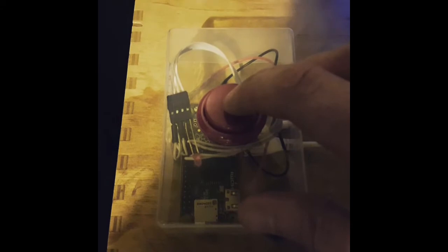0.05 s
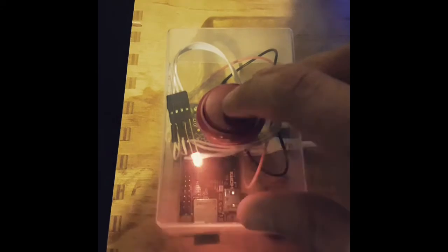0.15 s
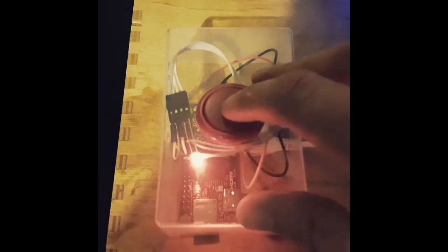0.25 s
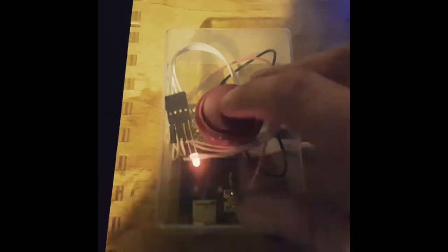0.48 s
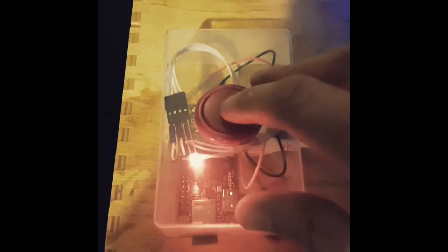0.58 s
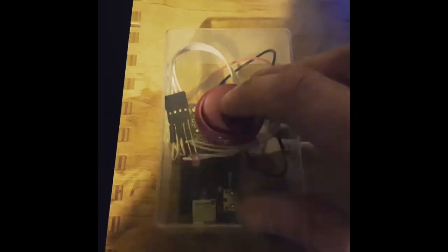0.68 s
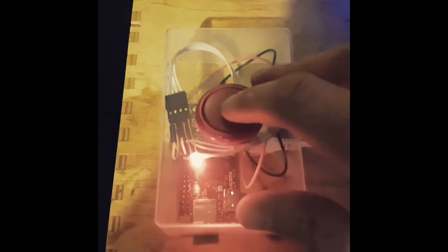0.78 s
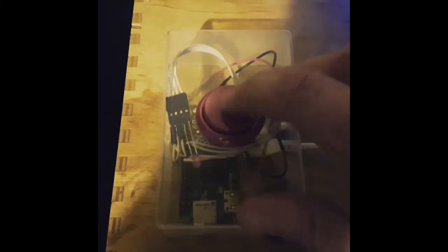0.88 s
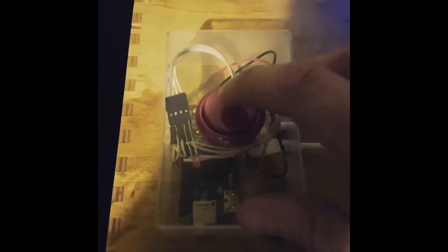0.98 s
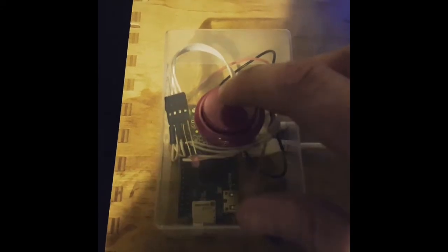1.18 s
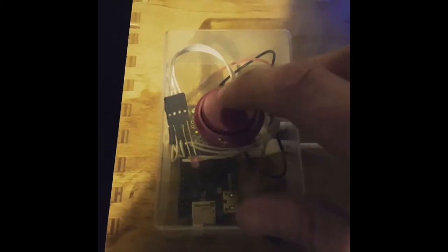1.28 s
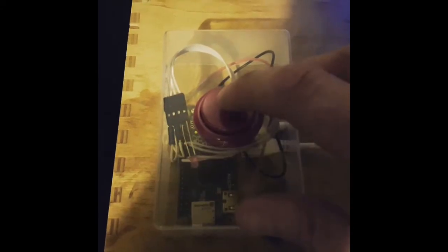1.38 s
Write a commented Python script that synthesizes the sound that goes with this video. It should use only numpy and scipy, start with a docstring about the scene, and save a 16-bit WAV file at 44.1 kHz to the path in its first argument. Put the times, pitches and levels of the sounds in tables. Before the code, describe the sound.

Close to the microphone in a quiet room, a large plastic push button clicks four times in a fast, even rhythm. Crisp snaps alternate with hollow clacks as it springs back, with light thumps of its box on the table.

```python
"""An arcade button in a plastic box is pressed and let go four times, close up in a quiet room.
On each press the plunger rubs down its guide, the microswitch snaps brightly and the plunger hits bottom
about 11 ms later; on release it springs up against its stop with a duller clack. Each hard contact rings
the button, the box and the switch spring. Short hollow tones give the clicks a low, falling ring and add
soft knocks between them. The box thumps on the table, over faint room air and hum."""
import sys
import numpy as np
from scipy import signal
from scipy.fft import rfft, irfft
from scipy.io import wavfile
from scipy.ndimage import uniform_filter1d

SR = 44100
rng = np.random.default_rng(int(sys.argv[2]) if len(sys.argv) > 2 else 0)


def wav_record(signal):
    """Record a signal, one row per channel, as 16-bit PCM in the file named by sys.argv[1]."""
    frames = np.transpose(np.atleast_2d(signal))
    bounded = np.clip(frames, -1, 1)
    # unit amplitude maps onto the largest positive 16-bit level
    quanta = np.round(bounded * 32767).astype(np.int16)
    wavfile.write(sys.argv[1], SR, quanta)


N = 63945
T = np.arange(N) / SR
LOG_FREQS = np.log(np.maximum(np.fft.rfftfreq(N, 1 / SR), 1))


def undb(db):
    """Decibels to gain."""
    return 10 ** (np.asarray(db) / 20)


def fade(t60_s, hold_s=0):
    """Full level for the hold, then exponential decay."""
    return np.exp(-np.log(1000) * np.maximum(T - hold_s, 0) / t60_s)


def rise(attack_s):
    """Smooth attack."""
    return 1 - np.exp(-T / attack_s)


def ring(hz, t60_s):
    """One decaying mode."""
    return np.sin(2 * np.pi * hz * T) * fade(t60_s)


def coloured(x, curve):
    """EQ a sound along a curve of (freq_hz, gain_db) points."""
    hz, db = np.array(curve).T
    return irfft(rfft(x) * undb(np.interp(LOG_FREQS, np.log(hz), db)), N)


def noise(curve):
    """Noise of rms 1, coloured by an EQ curve."""
    y = coloured(rng.standard_normal(N), curve)
    return y / y.std()


def low_cut(x, hz):
    """Roll off the bass."""
    return signal.sosfilt(signal.butter(2, hz, "high", fs=SR, output="sos"), x)


def add(out, start_s, sound):
    """Mix a sound in from a start time."""
    i = int(start_s * SR)
    out[i:] += sound[:N - i]


def lead_in(out, end_s, sound, t60_s):
    """Mix in a sound that swells up to an end time and stops dead."""
    i = int(end_s * SR)
    out[:i] += sound[:i] * fade(t60_s)[:i][::-1]


# colour of the room air: freq_hz, gain_db
AIR_EQ = [(15, -43), (25, -23.5), (76, -9.5), (127, -5), (175, -6.5), (263, -7), (301, -6.5), (427, -11.5),
          (575, -13.5), (936, -17.5), (1330, -19.5), (6380, -38.5), (12500, -40.5), (14000, -36),
          (16000, -43)]
# steady hum: pitch_hz, level_db
HUM_TONES = [(140, -78.5), (296, -73.5), (425, -80)]

def room_tone():
    """A bed of quiet air and faint hum."""
    hum = sum(undb(db) * np.sqrt(2) * np.sin(2 * np.pi * (hz * T + rng.random())) for hz, db in HUM_TONES)
    return undb(-64.5) * noise(AIR_EQ) + hum


# plunger strokes: end_s, rub_db, swell_t60_s, squeak_db
STROKES = [(0.248, -53.5, 0.12, -54), (0.389, -41.5, 0.061, -60), (0.461, -45.5, 0.12, -54),
           (0.557, -38.5, 0.043, -54), (0.64, -51, 0.36, -39.5), (0.736, -47.5, 0.073, -57),
           (0.822, -46, 0.21, -72), (0.932, -41, 0.11, -55)]
# colours of the rub and its thin squeak: freq_hz, gain_db
RUB_EQ = [(100, -7.5), (400, 5.5), (750, 6.5), (1150, 2.5), (1700, -17), (3300, -16), (6000, -43),
          (11000, -38), (14000, -29), (16000, -33)]
SQUEAK_EQ = [(1500, -21), (2600, -30), (2980, 10), (3400, -10), (6000, -27), (11000, -28), (14000, -5),
             (16000, -13)]

def plunger_slides():
    """Plastic rubs on plastic, swelling as the plunger speeds along its guide up to each click."""
    out = np.zeros(N)
    grain_s, roughness_db = 0.002, 2.5
    grain = uniform_filter1d(rng.standard_normal(N), int(grain_s * SR))
    rub = noise(RUB_EQ) * undb(roughness_db * grain / grain.std())
    squeak = noise(SQUEAK_EQ)
    for end_s, rub_db, swell_t60_s, squeak_db in STROKES:
        lead_in(out, end_s, undb(rub_db) * rub, swell_t60_s)
        lead_in(out, end_s, undb(squeak_db) * squeak, t60_s=0.034)
    return out


# short hollow tones, on and between the clicks: start_s, level_db, pitch_hz
HOLLOW_NOTES = [(.2005, -46.5, 660), (.208, -45.5, 730), (0.238, -52, 734), (.2485, -36.5, 710),
                (.2525, -34.5, 663), (.2625, -44.5, 840), (0.3448, -45.5, 656), (.3900, -30.5, 609),
                (0.3949, -46, 610), (0.417, -43, 815), (.4210, -36, 680), (.464, -35.5, 740),
                (.534, -42.5, 635), (0.542, -34.5, 810), (.5622, -30, 630), (0.623, -43, 1040),
                (0.6397, -32, 648), (0.6432, -29, 597), (.6520, -28.5, 574), (.7000, -46, 665),
                (.7300, -35.5, 836), (.7445, -33.5, 701), (0.781, -32, 640), (0.807, -53, 780),
                (.816, -38, 750), (.826, -38, 650), (.8365, -37.5, 560), (0.887, -46.5, 704),
                (.925, -42.5, 828), (0.9337, -27, 609), (.9598, -35, 747)]
# partials of one tone: pitch_ratio, gain_db, t60_s
HOLLOW_MODES = [(.68, -12, 0.044), (1, 6.5, 0.016), (1.5, -6, 0.016)]
# colour of its dull tick: freq_hz, gain_db
TICK_EQ = [(400, -3), (1100, 1.5), (1800, -7), (4000, -17), (8000, -36), (15000, -37)]

def hollow_tones():
    """Short hollow tones: the low, falling ring of each click, plus soft knocks between clicks."""
    out = np.zeros(N)
    for start_s, level_db, pitch_hz in HOLLOW_NOTES:
        body = sum((-1) ** k * undb(db) * ring(pitch_hz * ratio, t60_s)
                   for k, (ratio, db, t60_s) in enumerate(HOLLOW_MODES))
        tick = undb(-12) * noise(TICK_EQ) * fade(t60_s=0.026)
        add(out, start_s, undb(level_db) * (body + tick) * rise(attack_s=0.00069))
    return out


# resonances of button and box: pitch_hz, t60_s, snap_db, bottom_db, release_db
BODY_MODES = [(229, 0.04, 7.5, -14, -19.5), (486, 0.031, 4.5, -7, -10), (556, .024, 1, -11.5, -20),
              (816.4, 0.021, 18, 7, -2.5), (975, .02, 8, -0.5, -0.5), (1188, 0.018, 23, -0.5, 2),
              (1498, .018, 16, -11, -9), (2076, 0.011, 2, -10, -9.5), (2440, 0.013, -20, -1.5, -18),
              (3127, 0.021, 16.5, -19, -13), (3610, 0.013, -18, -7.5, -10), (3970, 0.013, 8.5, -5.5, -19.5)]
# ping of the metal switch spring: pitch_hz, gain_db, t60_s
SPRING_MODES = [(4320, -9, 0.007), (5700, -8.5, .012), (6100, -13, 0.0074), (8200, -22, 0.021),
                (13700, 0, 0.011), (13600, -6, 0.0067), (14100, -5, .012), (15300, -3.5, 0.0096),
                (15300, -8, 0.012)]

def clicks(hits, drive, crack_eq, crack_t60_s, spring_db, scrape=False):
    """Each hard contact rings the body, cracks brightly and pings the spring (spring_db re the crack)."""
    out = np.zeros(N)
    mid_hz, high_hz, spring_lag_s = 1700, 2650, 0.001
    column = ("snap", "bottom", "release").index(drive)
    spring = undb(spring_db) * sum(undb(db) * ring(hz, t60_s) for hz, db, t60_s in SPRING_MODES)
    for start_s, ring_db, pitch_ratio, mid_db, high_db, crack_db in hits:
        body = np.zeros(N)
        for k, (hz, t60_s, *drive_db) in enumerate(BODY_MODES):
            band_db = high_db if hz > high_hz else mid_db if hz > mid_hz else 0
            body += (-1) ** k * undb(drive_db[column] + band_db) * ring(hz * pitch_ratio, t60_s)
        grit = undb(crack_db) * noise(crack_eq)
        crack = grit * fade(crack_t60_s, hold_s=0.0018) * rise(attack_s=0.00014)
        add(out, start_s, undb(ring_db) * body * rise(attack_s=0.00079) + crack)
        add(out, start_s + spring_lag_s, undb(crack_db) * spring)
        if scrape:  # the plunger grazes its guide just before the stop
            lead_in(out, start_s, undb(-1) * grit, t60_s=0.006)
    return out


# switch snaps: start_s, ring_db, pitch_ratio, mid_db, high_db, crack_db
SNAP_HITS = [(.2450, -49.5, 0.87, 7, -8, -40), (.4571, -50.5, 0.83, -11, -17, -37),
             (.6361, -49, .98, 11, -11, -37), (.8196, -49, 0.966, 0, 1.5, -37.5)]
# colour of the switch's crack: freq_hz, gain_db
SNAP_EQ = [(300, -2), (1500, 1.5), (2500, 7.5), (4600, -15), (6200, -3), (6900, -13.5), (8200, -6),
           (9300, -6.5), (10300, -26), (11800, -9), (13000, 1.5), (15300, -4), (16500, -20)]

def switch_snaps():
    """The microswitch snaps over with a bright click."""
    return clicks(SNAP_HITS, "snap", SNAP_EQ, crack_t60_s=0.019, spring_db=1.5)


# down-stroke impacts: start_s, ring_db, pitch_ratio, mid_db, high_db, crack_db
BOTTOM_HITS = [(.2565, -24.5, 0.9, -3.5, -2.5, -37), (.4678, -21, 0.9, -12, 1, -32),
               (.6487, -26.5, 0.912, 5.5, 0.5, -35.5), (.8330, -26.5, 0.886, 6.5, -1, -35)]
# colour of the plunger's crack at either stop: freq_hz, gain_db
STOP_EQ = [(300, -36), (1500, 8), (2600, 5.5), (4000, 5.5), (5700, -2), (7000, -12), (8200, -3),
           (10000, -14), (11000, -5), (11800, -18), (13100, 7.5), (14200, -5), (15500, -14), (16500, -38)]

def plunger_bottoms():
    """The plunger hits bottom with a tight crack."""
    return clicks(BOTTOM_HITS, "bottom", STOP_EQ, crack_t60_s=0.0097, spring_db=-6.5, scrape=True)


# box against table: start_s, level_db
THUMP_HITS = [(0.261, -43.5), (0.396, -37.5), (0.474, -36.5), (0.585, -37), (0.783, -42), (0.828, -38.5),
              (0.868, -42.5), (0.956, -52)]

def box_thumps():
    """The box thumps on the table: one low mode with a soft attack."""
    out = np.zeros(N)
    thump = ring(hz=128.4, t60_s=0.063) * rise(attack_s=0.0067)
    for start_s, level_db in THUMP_HITS:
        add(out, start_s, undb(level_db) * thump)
    return out


# up-stroke impacts: start_s, ring_db, pitch_ratio, mid_db, high_db, crack_db
RELEASE_HITS = [(.3856, -28.5, 1.0, -26, 4.5, -46.5), (.5578, -22, 0.93, -1, -3.5, -48.5),
                (.7373, -24.5, 0.92, -3, 5.5, -50), (.9286, -25, 0.94, 6, 7, -44.5)]

def plunger_releases():
    """The plunger springs up against its stop with a duller clack."""
    return clicks(RELEASE_HITS, "release", STOP_EQ, crack_t60_s=0.033, spring_db=-2, scrape=True)


# small bounces: start_s, ring_db, pitch_ratio, mid_db, high_db, crack_db
REBOUND_HITS = [(.3985, -64, 0.84, -6, 12, -76), (.4805, -53.5, 1.07, 2, 21, -51.5),
                (.5403, -35, 1.07, 5.5, -8, -58), (.5738, -37.5, 0.928, 7, -8, -64),
                (.7475, -40.5, 1.15, 9, -4, -56)]
# colour of their crack: freq_hz, gain_db
REBOUND_EQ = [(500, 0), (4000, 4), (7000, -20), (15000, -17)]

def plunger_rebounds():
    """The plunger rebounds with faint clicks."""
    return clicks(REBOUND_HITS, "release", REBOUND_EQ, crack_t60_s=0.033, spring_db=-8)


# what the box radiates into the room, relative to its close sound: freq_hz, gain_db
SEND_EQ = [(200, -2), (500, -0.5), (800, -1), (1200, -1), (1700, 6.5), (2200, -3), (2650, 2.5), (3350, 0.5),
           (4500, 1), (7000, 1.5), (11000, 3.5), (13100, -4.5), (15500, -3)]
# reverb tail: band_hz, level_db, t60_s
TAIL_BANDS = [(131, -4.5, 1), (346, -6.5, 0.19), (747, -26.5, 1), (2020, -20, 0.99), (3600, -20, 0.45),
              (7140, -20.5, 1), (14200, -20, 0.98)]

def room_reverb(x):
    """Quick reflections from small nearby surfaces, which return little bass, then a diffuse tail."""
    def decay(t60_s, predelay_s=0.006):
        envelope = fade(t60_s) * (T > predelay_s)
        return envelope / np.linalg.norm(envelope)

    band_hz, level_db, t60_s = np.array(TAIL_BANDS).T
    white = rfft(rng.standard_normal(N))
    response = undb(-18) * low_cut(rng.standard_normal(N) * decay(t60_s=0.13), hz=650)
    for k, solo in enumerate(np.eye(len(band_hz))):
        band = irfft(white * np.interp(LOG_FREQS, np.log(band_hz), solo), N)
        response += undb(level_db[k]) * band * decay(t60_s[k])
    return signal.fftconvolve(coloured(x, SEND_EQ), response)[:N]


# slight mismatch of the two microphone ports: freq_hz, gain_db
PORT_EQ = [(100, -51), (700, -72), (1400, -75), (3000, -36), (6000, -55), (14000, -42)]
# colour of the air in the side channel: freq_hz, gain_db
SIDE_AIR_EQ = [(15, -44), (25, -14), (195, -4), (439, -6), (1400, -9.5), (2690, -12), (3720, -17),
               (13200, -33), (16000, -30)]

def scene():
    """A mid/side mix with the button in the centre, almost mono."""
    hard = switch_snaps() + plunger_bottoms() + plunger_releases() + plunger_rebounds()
    button = low_cut(hard, hz=106)  # the hard clicks carry little deep bass
    button += hollow_tones() + box_thumps() + plunger_slides()
    mid = button + room_reverb(button) + room_tone()
    side = coloured(signal.hilbert(button).imag, PORT_EQ)  # 90 degrees out of phase with the mid
    side += 0.01 * room_reverb(button) + undb(-80) * noise(SIDE_AIR_EQ)
    return np.array([mid + side, mid - side])


def record(dry):
    """A steep low-pass takes off the very top."""
    top_hz = 16200
    return signal.sosfilt(signal.ellip(8, .2, 70, top_hz, fs=SR, output="sos"), dry)


dry = scene()
out = record(dry)
wav_record(out)
```